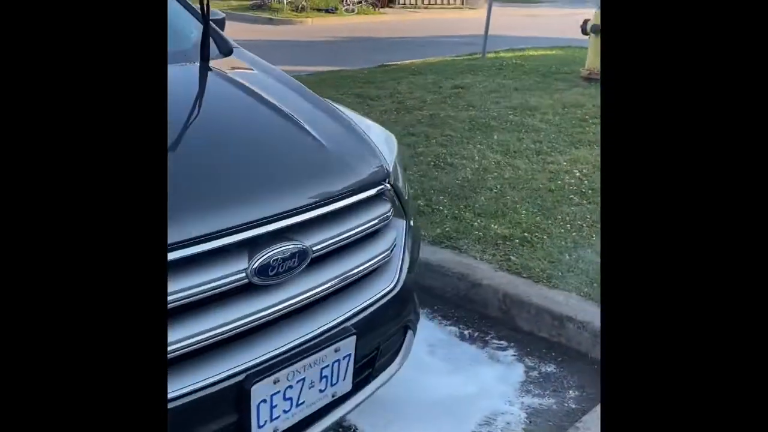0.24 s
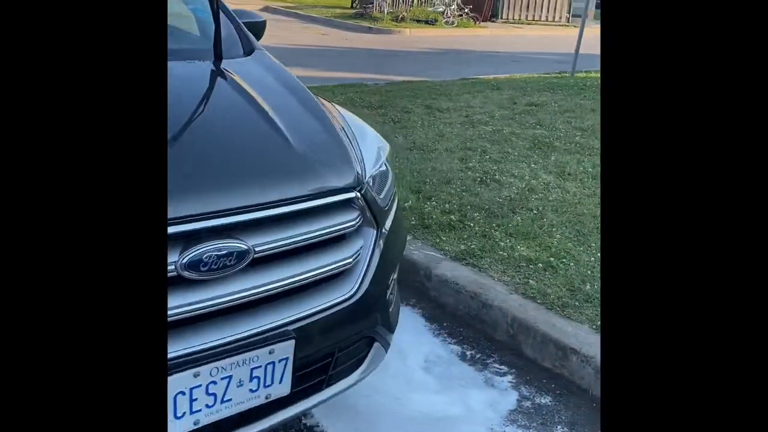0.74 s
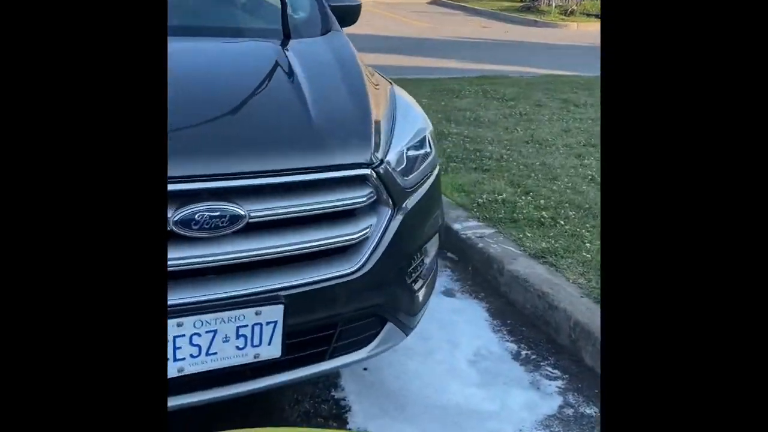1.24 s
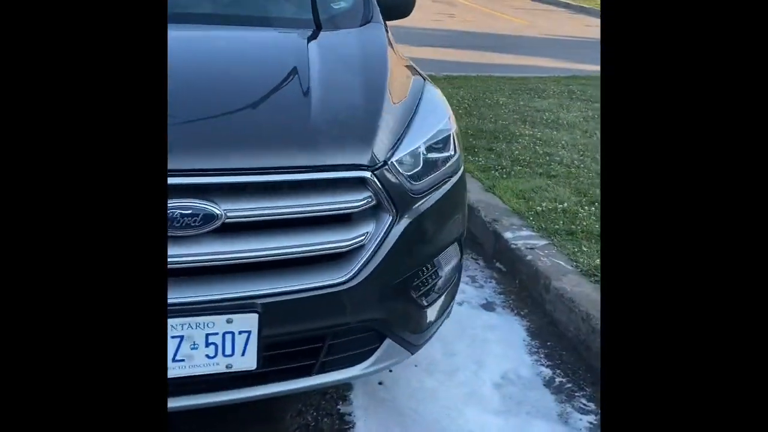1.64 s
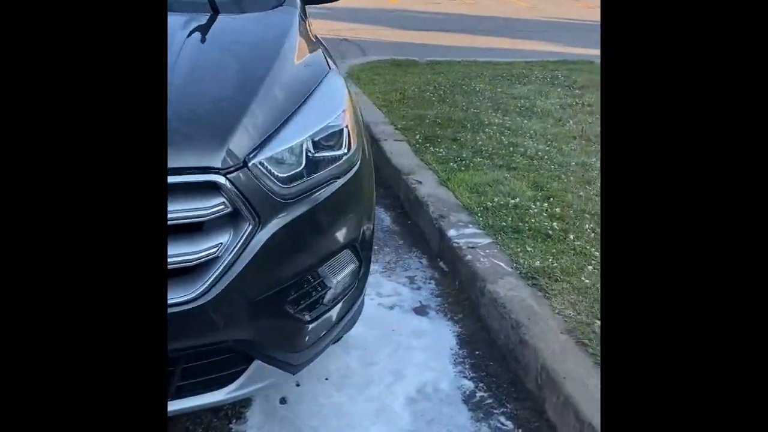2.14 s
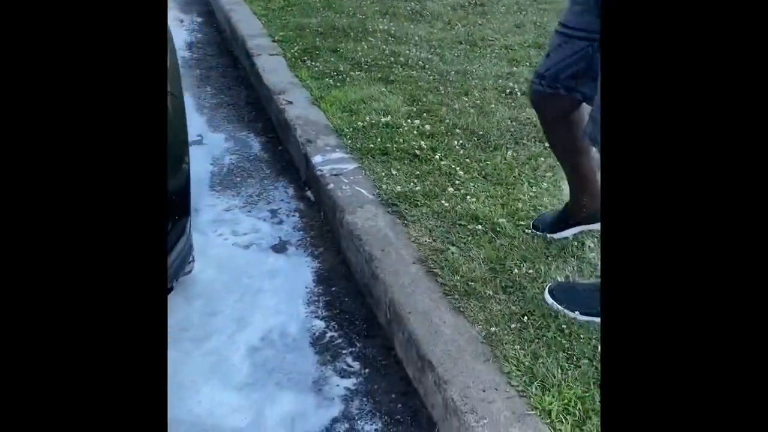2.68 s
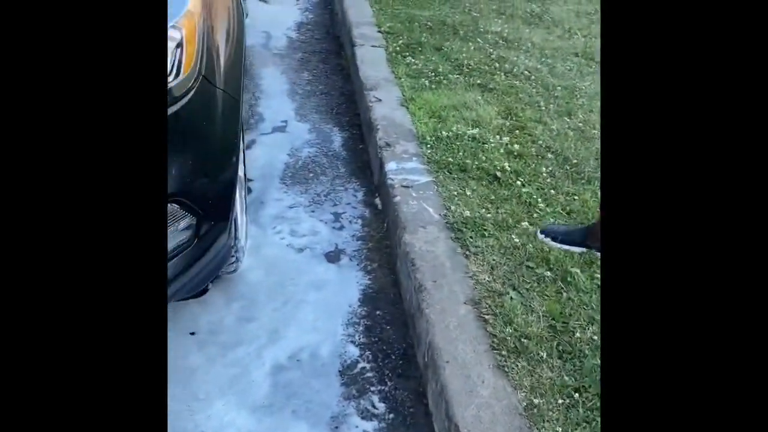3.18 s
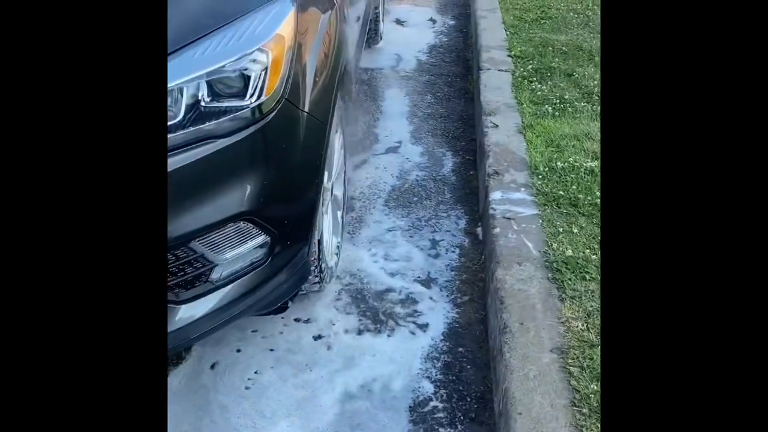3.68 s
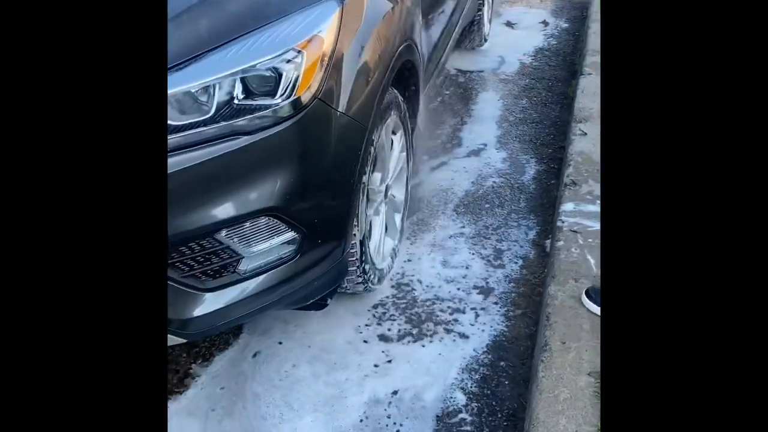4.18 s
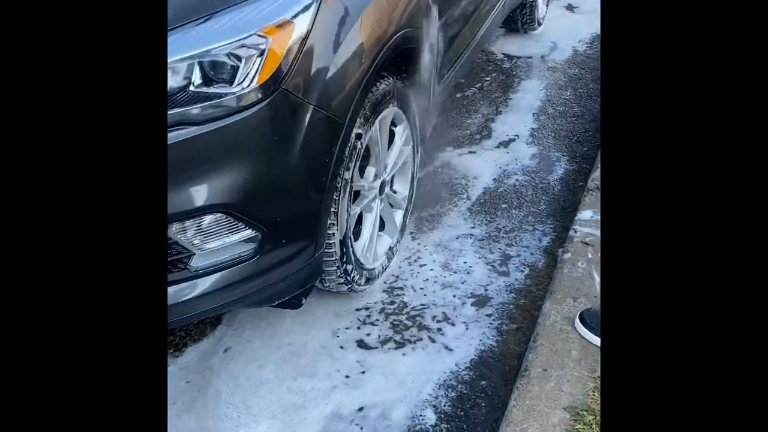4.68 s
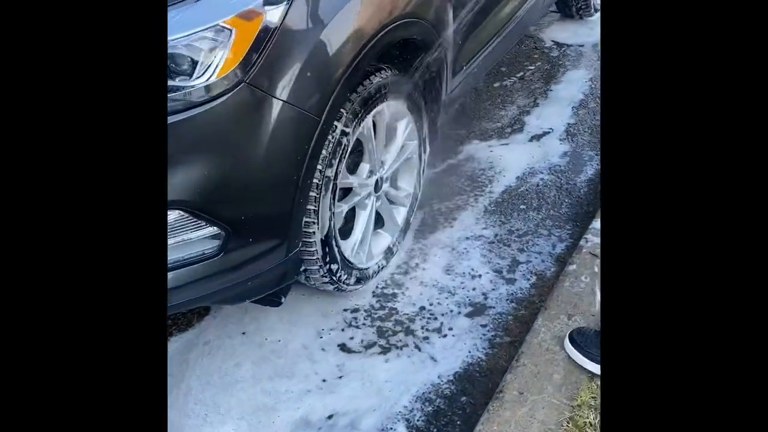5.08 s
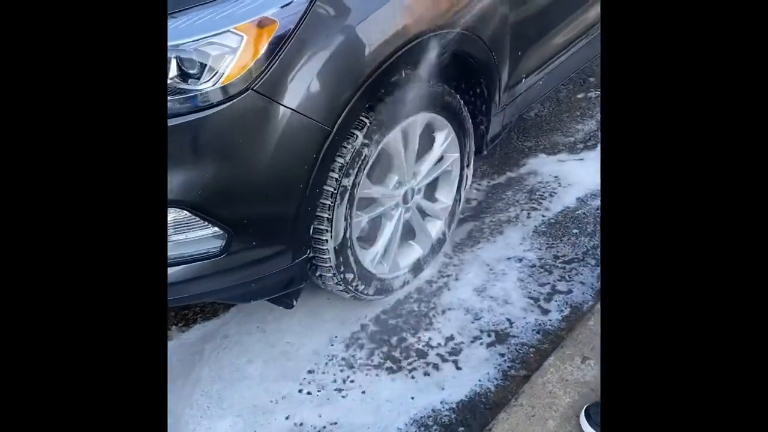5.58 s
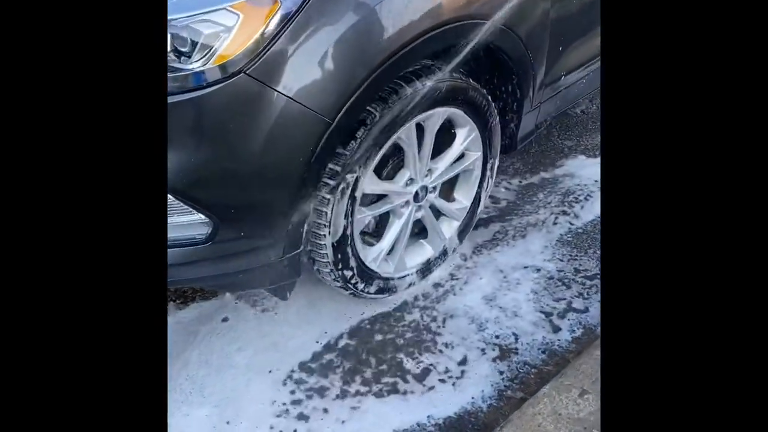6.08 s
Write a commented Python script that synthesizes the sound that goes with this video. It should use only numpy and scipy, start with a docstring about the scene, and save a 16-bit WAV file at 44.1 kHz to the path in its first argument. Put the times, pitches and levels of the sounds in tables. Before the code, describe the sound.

Outdoors, close to a handheld phone, a hose sprays a car beside wet pavement. From 0 s a short splash patters on metal, then fades to thin, uneven hiss with a small click at 0.2 s. Around 1.1-1.3 s spray returns as wind knocks the microphone with deep thuds. From 1.4 to 2.1 s quick spurts drum brightly on the panel, with short sliding ringing tones. The water weakens, gives a hissy burst near 2.6 s, and almost cuts out around 3 s. Clicks and a sharp spit restart it at 3.1-3.3 s. From 3.5 s stronger passes beat the wheel, hollow and boomy near 3.7-4 s, then pulse through 5.5 s with fuller hiss. Another wind thump comes near 4.9 s; low drumming at 5.9 s leads to a final bright splash around 6.2 s. A faint low machine hum wavers throughout.

```python
"""On a wet pavement beside a car, a garden hose is swept in spurts over bodywork and wheel, close to a phone.
The nozzle hisses as filtered noise that arrives in uneven drops, with coarser spatter beneath it.
The jet drives the car's modes as drumming; sheet metal rings, and some spots sing a sliding pitch.
Wind thumps on the microphone ports, clicks and slaps ring briefly, and a far machine hums in wavering tones.
The treble from 7750 to 11850 Hz is wide and hollow, the right side set to the left inverted."""
import sys
import numpy as np
from scipy import signal
from scipy.fft import rfft, irfft, next_fast_len
from scipy.io import wavfile
from scipy.ndimage import uniform_filter1d

SR = 44100
rng = np.random.default_rng(int(sys.argv[2]) if len(sys.argv) > 2 else 0)


def bounce(signal):
    """Save signal as a 16-bit WAV file at the path given by the first command-line argument."""
    frames = np.transpose(np.atleast_2d(signal))
    limited = np.clip(frames, -1, 1)
    pcm = np.round(limited * 32767).astype(np.int16)
    wavfile.write(sys.argv[1], SR, pcm)


N = 279153


def gain_of(db):
    """Decibel law: 20 dB is a factor of ten in amplitude."""
    return 10 ** (np.asarray(db) / 20)


def evened(x):
    """Normalisation: scales a signal to rms 1."""
    return x / np.sqrt(np.mean(x ** 2) + 1e-20)


def read(points, hz):
    """Interpolation on a logarithmic frequency axis: the columns of a spectrum table at hz."""
    f, *columns = np.transpose(points)
    return [np.interp(np.log(hz + 1), np.log(f + 1), c) for c in columns]


def follow(rows, t):
    """Linear interpolation in time: the columns of a curve table at times t."""
    s, *columns = np.transpose(rows)
    return [np.interp(t, s, c) for c in columns]


def swelled(bed, events, t):
    """Power addition: each event rises and falls as a leaning arch on top of the bed; columns in dB."""
    power = gain_of(follow(bed, t)) ** 2
    for middle, length, *db in events:
        span = slice(*np.searchsorted(t, [middle - length / 2, middle + length / 2]))
        progress = abs((t[span] - middle) / length + .5)
        arch = abs(np.sin(np.pi * progress ** 0.92)) ** 1.34
        power[:, span] += (gain_of(db)[:, None] * arch) ** 2
    return 10 * np.log10(power)


def drops(lumpy_db, drop_s):
    """Amplitude modulation: two unrelated noises share the uneven arrival of drops."""
    lumps = evened(uniform_filter1d(rng.standard_normal(N), size=max(int(drop_s * SR), 1)))
    return evened(rng.standard_normal((2, N)) * gain_of(lumpy_db * lumps))


def coloured(x, colour_db, patchy_db, size, count=5):
    """Time-varying filtering: a spectrum colour_db(Hz, s) with drifting patches, count bins wide."""
    overlap = size - size // 4
    hz, t, z = signal.stft(x, SR, nperseg=size, noverlap=overlap)
    patches = uniform_filter1d(rng.standard_normal(z.shape[1:]), size=count, axis=0)
    patches = evened(uniform_filter1d(patches, size=12, axis=1, mode="wrap"))
    shaped = z * gain_of(colour_db(hz, t) + patchy_db * patches)
    return signal.istft(shaped, SR, nperseg=size, noverlap=overlap)[1][:, :N]


def steady(points):
    """Stationary spectrum: the same colour at all times, for coloured()."""
    return lambda hz, t: read(points, hz)[0][:, None]


def street():
    """White noise: the faint even wash of the street, equal power at every frequency."""
    return gain_of(-83.5) * rng.standard_normal((2, N))


# hum of the far machine: time_s [levels glide between rows], low_pair_db [dB], third_db [dB], fourth_db [dB]
HUM_LEVELS = [(0, -57.5, -69, -87), (.6, -61.5, -66, -61), (1.4, -55, -60.5, -59), (1.85, -75, -75, -76),
              (2.05, -52, -49, -55), (2.4, -50.5, -55.5, -57), (2.8, -48, -51.5, -59),
              (3.1, -47.5, -47.5, -66.5), (3.8, -48, -48, -63), (4.5, -51.5, -60, -58.5),
              (6.33, -50, -53.5, -56.5)]
# its four tones: pitch_hz, width_hz, level_db [added to the levels above]
HUM_TONES = [(59.9, 3.6, 1), (120.6, 4.5, -3.5), (155, 3.4, -0.5), (239, 0.94, 1.5)]


def hum(t):
    """Narrow-band noise: each tone is a firm core plus noise that wavers within a few hertz."""
    out = np.zeros((2, N))
    low_db, third_db, fourth_db = follow(HUM_LEVELS, t)
    for (hz, width, tone_db), db in zip(HUM_TONES, [low_db, low_db, third_db, fourth_db]):
        pole = np.exp(-np.pi * width / SR)
        noise = rng.standard_normal((2, N)) + 1j * rng.standard_normal((2, N))
        waver = signal.lfilter([1 - pole], [1, -pole], noise)
        waver = waver / np.sqrt(np.mean(abs(waver) ** 2))
        core = 2.3 * np.array([[1], [1j]])  # a quarter cycle apart in the pair
        carrier = np.exp(2j * np.pi * hz * t)
        out += gain_of(db + tone_db) * evened(((core + waver) * carrier).real)
    return out


# gusts on the ports: time_s [levels glide between rows], thump_db [before a 1 dB lift],
# flutter_db [re thump, before a 3 dB cut]
GUSTS = [(0.0, -57, 10), (0.92, -52.5, 2), (1.3, -42, -2), (1.41, -52.5, 1), (1.99, -59, 9),
         (2.26, -43, -11), (2.43, -51, 3), (3.17, -47.5, -4.5), (4.53, -50.5, 2.5), (5.04, -43, -12),
         (5.57, -49, 7.5), (5.78, -54, -10.5), (5.89, -50, 15), (6.08, -50, 1.5), (6.33, -50.5, 1)]
# spectrum of the deep thump: pitch_hz, level_db [relative, per Hz]
THUMP_SPECTRUM = [(28, -44), (42, -2), (62, -2), (95, 3), (130, -6.5), (300, -43.5)]
# spectrum of the faster flutter: pitch_hz, level_db [relative, per Hz]
FLUTTER_SPECTRUM = [(60, -35.5), (120, -1), (190, 4), (300, -4), (600, -24)]


def wind(t):
    """Turbulent pressure on the ports: lumpy low-frequency noise, a deep thump and a faster flutter."""
    thump_db, flutter_db = follow(GUSTS, t)
    thump = evened(coloured(drops(2.5, .03), steady(THUMP_SPECTRUM), 1.0, size=4096))
    flutter = evened(coloured(drops(2.5, .015), steady(FLUTTER_SPECTRUM), 1.5, size=2048))
    return gain_of(thump_db + 1.0) * thump + gain_of(thump_db + flutter_db - 3.0) * flutter


def rings(events, puff_share):
    """Damped oscillation: each event is a short decaying sine, roughened by a share of noise."""
    length, rise_s = 4096, .0004
    out, t = np.zeros((2, N + length)), np.arange(length) / SR
    puffs = rng.standard_normal((len(events), 2, length))
    for (s, db, hz, t60), puff in zip(events, puffs):
        at = round(s * SR)
        envelope = gain_of(db - 60 * t / t60) * np.minimum(t / rise_s, 1)
        roughness = 1 + puff_share * uniform_filter1d(puff, size=8)
        out[:, at:at + length] += envelope * np.sin(2 * np.pi * hz * t) * roughness
    return out[:, :N]


# gusts that knock the ports: start_s, level_db, pitch_hz, t60_s
KNOCKS = [(0.07, -30.5, 122, 0.039), (1.165, -32, 190, 0.13), (1.177, -21.5, 187, 0.012),
          (1.218, -33, 136, 0.056), (1.248, -23, 114, 0.051), (1.281, -25.5, 133, 0.051),
          (4.943, -23.5, 62.6, 0.041), (5.96, -30, 71, 0.13)]


def knocks():
    """Impulsive excitation: a gust knocks the ports into a smooth low ring."""
    return rings(KNOCKS, puff_share=0)


# trigger clicks and single slaps of water: start_s, level_db [before roughening], pitch_hz, t60_s
CLICKS = [(0.208, -36.5, 1384, 0.033), (1.458, -34, 783, 0.052), (1.848, -35, 1100, 0.0059),
          (1.862, -27, 1050, 0.029), (3.104, -38, 883, 0.027), (3.107, -43, 2610, 0.03),
          (3.129, -25.5, 1950, 0.004), (3.243, -20, 11970, 0.0091), (3.248, -36, 4220, 0.044),
          (3.308, -34, 1210, 0.03), (3.405, -34, 1334, 0.034), (4.9625, -20, 997, 0.018),
          (5.876, -30, 566, 0.026), (6.214, -26.5, 1025, 0.057)]


def clicks():
    """Impact excitation: trigger clicks and water slaps are short rings with a noisy surface."""
    return rings(CLICKS, puff_share=1.8)


# how hard the trigger lets the water run: time_s [levels glide between rows], hiss_db [before a 10 dB lift]
FLOW = [(0, -58), (1.196, -55), (1.696, -51), (2.196, -50.5), (2.519, -64), (2.532, -59), (2.876, -47),
        (2.966, -100), (3.137, -82), (3.141, -52), (3.239, -62), (3.245, -47), (4.474, -47.5),
        (4.524, -43.5), (5.776, -40.5), (5.876, -51), (6.329, -42.5)]
# swells as the nozzle spurts or swings towards the phone: middle_s, length_s, hiss_db [before the same lift]
SURGES = [(0.016, 0.48, -47), (0.11, 0.09, -45.5), (0.321, 0.17, -48), (0.469, 0.136, -51.5),
          (0.697, 0.38, -56), (0.995, 0.25, -50), (1.101, 0.16, -47.5), (1.329, 0.15, -54),
          (1.562, 0.1, -48), (1.734, 0.25, -47.5), (1.92, 0.35, -43.5), (2.094, 0.083, -48.5),
          (2.558, 0.084, -41), (2.738, 0.44, -48.5), (3.25, 0.025, -39), (3.458, 0.093, -45.5),
          (3.688, 0.35, -40), (3.936, 0.22, -35.5), (4.572, 0.17, -42), (4.922, 0.13, -37),
          (5.089, 0.067, -37), (5.275, 0.17, -37), (5.615, 0.15, -41.5), (6.311, 0.365, -39.5)]


def hiss_level(t):
    """Flow noise follows the water: surges add their power to the gliding flow."""
    return swelled(FLOW, SURGES, t)[0]


# hiss spectrum: pitch_hz, level_db [relative, per Hz]
HISS_SPECTRUM = [(2500, -12.5), (6000, -6), (8000, -1), (11500, -4.5), (13200, -2), (14200, -0.5),
                 (16000, 0)]


def nozzle(t):
    """Turbulent jet noise: the fine hiss of water leaving the nozzle."""
    hiss = evened(coloured(drops(1.5, .002), steady(HISS_SPECTRUM), 1.5, size=256))
    return gain_of(hiss_level(t) + 10.0) * hiss


# stray spray and run-off between the passes: time_s [levels glide between rows],
# drumming_db, boom_db, splash_db, spatter_db [the first three relative, before the body modes]
DRIZZLE = [(0.0, -58.5, -55.5, -59, -91), (0.9, -56, -56, -55, -56.5), (2.1, -60, -57, -54.5, -57),
           (2.9, -58.5, -54.5, -61.5, -86), (3.2, -61, -54, -64, -74), (3.6, -52.5, -45.5, -50.5, -72),
           (4.3, -51, -48, -50, -69), (5.1, -54, -63.5, -52.5, -46.5), (5.7, -51.5, -58, -50, -80),
           (6.33, -51.5, -45.5, -54, -54)]
# the jet sweeps across a part of the car:
# middle_s, length_s, drumming_db, boom_db [hollow panel], splash_db [bright], spatter_db [as in DRIZZLE]
PASSES = [(0, 0.13, -36.5, -55, -39.5, -53.5), (0.116, 0.13, -47, -52, -40.5, -44),
          (0.159, 0.2, -47, -76, -49, -56.5), (1.108, 0.1, -46, -56, -38.5, -49),
          (1.285, 0.14, -46, -70, -40.5, -40.5), (1.4, 0.13, -52, -57, -45.5, -45.5),
          (1.466, 0.087, -49.5, -46.5, -41.5, -50), (1.551, 0.16, -43.5, -54.5, -36, -41),
          (1.686, 0.25, -44.5, -56, -40.5, -38.5), (1.757, 0.075, -35, -64, -40.5, -39.5),
          (1.871, 0.16, -33, -55, -34, -49), (1.958, 0.054, -32.5, -56, -32, -66),
          (2.002, 0.16, -46, -51.5, -39, -42), (2.124, 0.12, -66, -65, -68, -38.5),
          (2.572, 0.11, -63, -54, -43.5, -44.5), (2.861, 0.11, -58, -67, -50.5, -43.5),
          (3.269, 0.073, -50, -53, -41.5, -39), (3.313, 0.079, -56, -61, -49, -42.5),
          (3.458, 0.125, -36.5, -38.5, -37, -41.5), (3.667, 0.11, -35.5, -30.5, -32.5, -43),
          (3.737, 0.13, -34.5, -36, -34, -41), (3.84, 0.49, -46, -35.5, -49, -76),
          (3.946, 0.17, -33.5, -47, -34.5, -60), (4.055, 0.27, -44.5, -42.5, -69, -72),
          (4.232, 0.073, -51, -44.5, -43.5, -64), (4.456, 0.085, -42.5, -44, -48.5, -59),
          (4.655, 0.12, -40.5, -42.5, -39, -58), (4.978, 0.089, -40, -42, -39, -58),
          (5.155, 0.15, -41.5, -40.5, -41, -60.5), (5.28, 0.27, -59, -70, -59, -58),
          (5.364, 0.14, -39.5, -37.5, -38.5, -48.5), (5.5, 0.25, -46, -42.5, -45, -55),
          (5.89, 0.14, -37, -36.5, -51.5, -63), (5.963, 0.17, -43, -36, -52, -72),
          (6.265, 0.31, -38, -56, -40.5, -58.5), (6.268, 0.16, -37.5, -72, -33.5, -41)]


def impact_levels(t):
    """Superposition of impacts: passes of the jet add their power to the drizzle; four levels in dB."""
    return swelled(DRIZZLE, PASSES, t)


# spatter spectrum: pitch_hz, level_db [relative, per Hz]
SPATTER_SPECTRUM = [(1800, -12.5), (3500, -1.5), (5500, 2.5), (7500, -3), (10000, -33.5), (14000, -32.5)]


def spatter(t):
    """Droplet noise: coarser than the hiss, summed in power from the free jet and from each pass."""
    spray_follows, spray_db = 0.61, -21  # the free jet's share: dB per dB of hiss level, offset in dB
    jet_gain = gain_of(spray_follows * hiss_level(t) + spray_db)
    pass_gain = gain_of(impact_levels(t)[3])
    noise = evened(coloured(drops(1.4, 0.0039), steady(SPATTER_SPECTRUM), 4.06, size=256))
    return np.hypot(jet_gain, pass_gain) * noise


# the jet crosses a spot that sings, its pitch sliding with the aim:
# middle_s, length_s, level_db, start_pitch_hz, end_pitch_hz, width_hz [of each of two equal poles]
SINGING_SPOTS = [(0.134, 0.056, -40, 1940, 1320, 350), (1.413, 0.085, -42, 1900, 3160, 600),
                 (1.552, 0.077, -37, 3300, 2120, 700), (1.673, 0.042, -35.5, 2110, 2600, 600),
                 (1.736, 0.041, -31.5, 2420, 2340, 603), (3.671, .09, -33, 1950, 2000, 120),
                 (3.704, 0.057, -33, 540, 530, 69.5), (3.951, 0.045, -30.5, 685, 680, 60),
                 (4.05, 0.031, -34.5, 500, 475, 90), (4.975, 0.039, -36, 1060, 1180, 252),
                 (5.339, 0.085, -36, 1004, 1060, 108), (5.337, .08, -37, 540, 533, 131),
                 (5.388, 0.079, -36, 402, 281, 161), (5.683, 0.077, -45.5, 1380, 1330, 130),
                 (5.887, .07, -36, 613, 574, 50)]


def singing():
    """Resonance under random excitation: pattering drops ring one sliding mode under an arch."""
    out = np.zeros((2, N))
    patter = drops(2.3, .002)
    for middle, length, db, start_hz, end_hz, width in SINGING_SPOTS:
        at = round((middle - length / 2) * SR)
        u = np.arange(0, 1, 1 / (length * SR))
        span = slice(at, at + len(u))
        pitch_hz = start_hz + (end_hz - start_hz) * u
        turn = np.exp(2j * np.pi * np.cumsum(pitch_hz) / SR)
        pole = np.exp(-np.pi * width / SR)
        # shift the pitch to 0 Hz, filter there, then shift back
        ring = signal.lfilter([1], np.convolve([1, -pole], [1, -pole]), patter[:, span] / turn)
        out[:, span] += gain_of(db) * np.sin(np.pi * u ** 0.76) * evened((ring * turn).real)
    return out


# modes of the car: pitch_hz, width_hz, then level_db with the jet on the far door, the wing,
# the rim, the tyre and arch [dB, relative]
BODY_MODES = [(212, 150, -8, -7.5, -3, 1.5), (358, 68, 1, 4.5, -4, 5.5), (478.5, 67, 6.5, 5.5, 6, 6.5),
              (560, 74, 0, -9, -17, 5), (800, 108, -0.5, -1.5, 5.5, 3.5), (1086, 176, -7.5, 5.5, 0.5, 0.5),
              (1260, 190, 3, -3.5, 0, -3), (1560, 97, -2, -10, 2, -2.5), (1753, 97, 3.5, 3, 4.5, 3.5),
              (1903, 93, 0, -9, 7.5, 3.5), (2186, 680, -2.5, -2, 3, 1), (2950, 260, -20, -2, 1, -8),
              (3790, 460, -10, -6.5, 1, -12.5), (4440, 470, 5.5, -5, -10, -2)]
# where the jet points [s]: leaves the door, on the wing from and to, on the rim from and to, reaches the tyre
SPOT_S = (.2, 1.2, 2.1, 3.2, 4.1, 4.4)
# centres of boom, drumming and splash [Hz]
ZONES_HZ = (420, 1050, 2300)


def drumming():
    """Modal excitation: drops beat the car's modes; the struck spot decides how much it booms or splashes."""
    def colour_db(hz, t):
        """Modal sum: resonance curves add in power, under the level of each frequency zone."""
        force_db, boom_db, splash_db, _ = impact_levels(t)
        modes = 0
        for f, width, door, wing, rim, tyre in BODY_MODES:
            mode_db = np.interp(t, SPOT_S, [door, wing, wing, rim, rim, tyre])
            modes = modes + gain_of(mode_db) ** 2 / (1 + (2 * (hz[:, None] - f) / width) ** 2)
        place = np.interp(np.log(hz + 1), np.log(ZONES_HZ), [-1, 0, 1])[:, None]
        blend = np.clip(1.92 * abs(place) - .4, 0, 1)  # each zone holds its level, with short cross-overs
        outer_db = np.where(place < 0, boom_db, splash_db - 3.0)
        zone_db = (1 - blend) * force_db + blend * outer_db
        # steep falls below 180 Hz and above 4500 Hz
        walls_db = -10 * np.log10((1 + (180 / (hz + 1)) ** 6) * (1 + (hz / 4500) ** 8))
        return 10 * np.log10(modes) + walls_db[:, None] + zone_db
    return gain_of(14.0) * coloured(drops(2.14, .0025), colour_db, 1.7, size=512, count=2)


def sheet_metal(x, t):
    """Dense modal reverberation: three patches of panel, each a short noise-like ring, take turns."""
    t60_s, ring_db, drifts_per_s = 0.078, -4.0, 4.5  # decay, ring re direct sound, swells of each patch
    u = np.arange(6000) / SR
    patch_rings = rng.standard_normal((3, len(u))) * gain_of(-60 * u / t60_s)
    patch_rings /= np.linalg.norm(patch_rings, axis=1, keepdims=True)
    # the squares of the three weights always sum to 1
    turns = np.cos(np.pi * (drifts_per_s * t + np.arange(3)[:, None] / 3)) * np.sqrt(2 / 3)
    rung = sum(signal.oaconvolve(x * turn, ring[None])[:, :N] for turn, ring in zip(turns, patch_rings))
    return (x + gain_of(ring_db) * rung) / np.hypot(1, gain_of(ring_db))


# port pair: pitch_hz, likeness [0-1], lead_early, lead_late [radians the right port leads],
# level_db [left re right]
PORTS = [(40, .96, .1, 0, 0), (170, .87, .15, 0, .1), (340, .92, .2, -.1, .6), (520, .9, .2, -.25, 1.6),
         (700, .85, .45, -.1, 4), (1050, .9, .6, .15, 5.5), (1400, .68, .8, .55, 5.3),
         (1900, .72, .8, .2, -2.5), (2400, .65, .4, -.4, 1), (3100, .6, 1.7, -.3, -1),
         (3950, .65, 1.65, 2.35, -.7), (5000, .3, 2.6, 2.9, -.5), (6000, .62, 4.3, 4.4, .6),
         (7050, .72, 3.8, 3.75, 0), (7700, .9, 3.3, 3.3, 0), (11900, .92, 3, 3, 0),
         (13100, .67, 2.3, 2.3, 0), (14100, .75, 1.65, 1.65, 0), (15900, .62, .8, .8, 0)]
# treble that is wide and hollow, the right side set to the left inverted: from, to [Hz]
HOLLOW_HZ = (7750, 11850)
# the phone swings round towards the wheel: from, to [s]
TURN_S = (2.1, 2.9)


def ports(pair, t):
    """Partial coherence: the right port hears a phase-turned share of the left, and a share of its own."""
    size = next_fast_len(N)
    hz = np.fft.rfftfreq(size, 1 / SR)
    like, lead_early, lead_late, lean_db = read(PORTS, hz)
    left, other = rfft(pair, size)
    phase_turns = np.exp(1j * np.array([lead_early, lead_late]))
    right = like * phase_turns * left + np.sqrt(1 - like ** 2) * other
    hollow = (hz > HOLLOW_HZ[0]) & (hz < HOLLOW_HZ[1])
    lean = gain_of(lean_db / 2)
    early, late = irfft(np.where(hollow, -left, right) / lean, size)[:, :N]
    turned = np.interp(t, TURN_S, [0, 1])
    return np.array([irfft(left * lean, size)[:N], (1 - turned) * early + turned * late])


def scene():
    """Superposition: all sources add, then pass through the port pair."""
    t = np.arange(N) / SR
    background = street() + hum(t) + wind(t) + knocks()
    water = clicks() + nozzle(t) + spatter(t) + singing() + sheet_metal(drumming(), t)
    return ports(background + water, t)


def record(dry):
    """Band limiting: a steep linear-phase low-pass removes what lies above its edge."""
    edge_hz = 15760
    low_pass = signal.firwin(2047, edge_hz, window=("kaiser", 9), fs=SR)
    return signal.oaconvolve(dry, low_pass[None], "same")


dry = scene()
out = record(dry)
bounce(out)
```